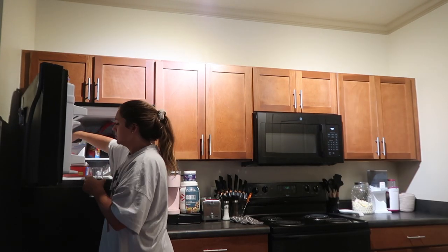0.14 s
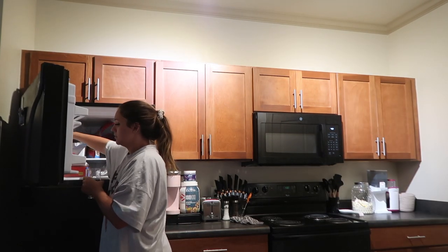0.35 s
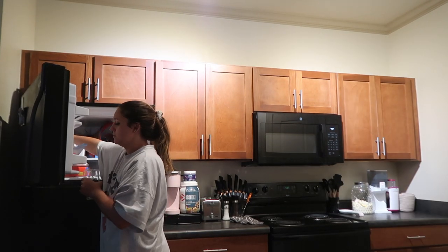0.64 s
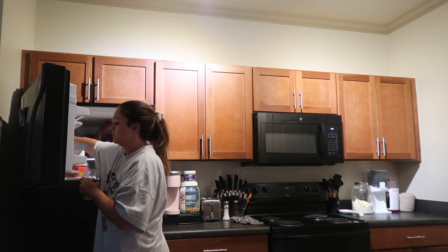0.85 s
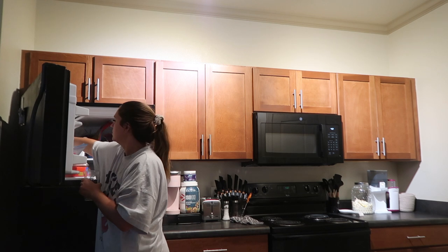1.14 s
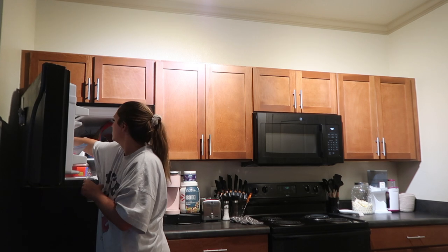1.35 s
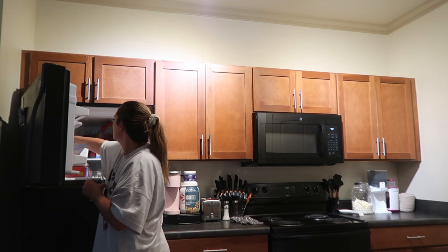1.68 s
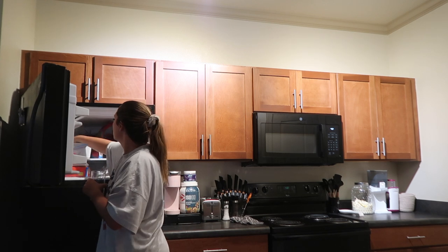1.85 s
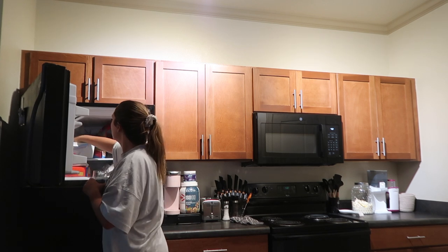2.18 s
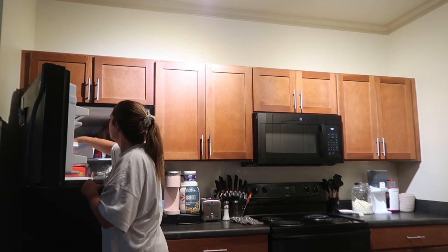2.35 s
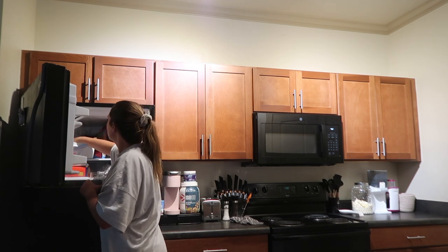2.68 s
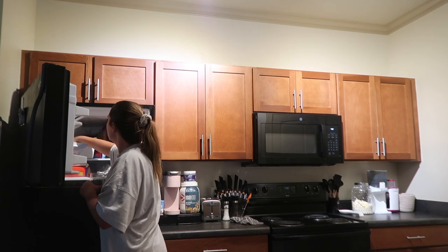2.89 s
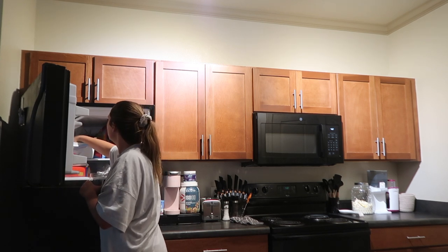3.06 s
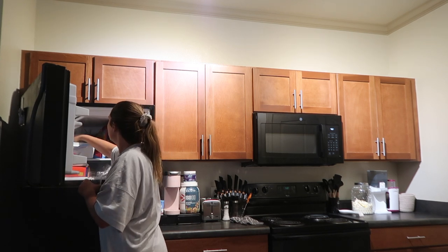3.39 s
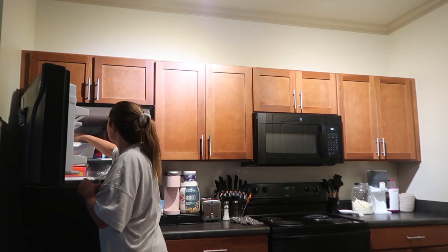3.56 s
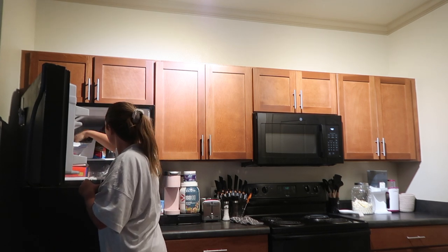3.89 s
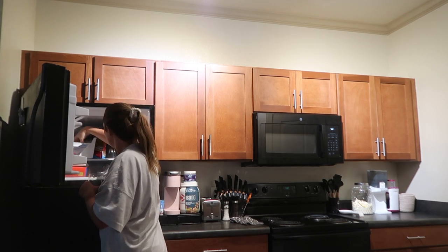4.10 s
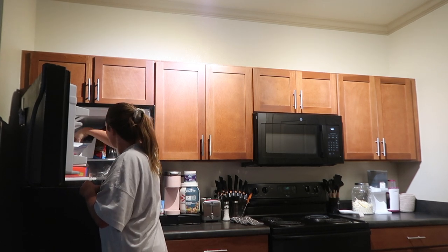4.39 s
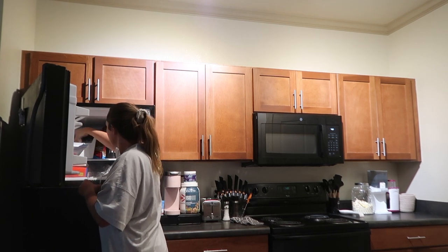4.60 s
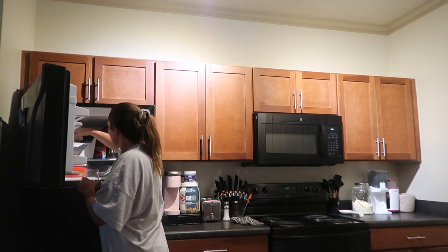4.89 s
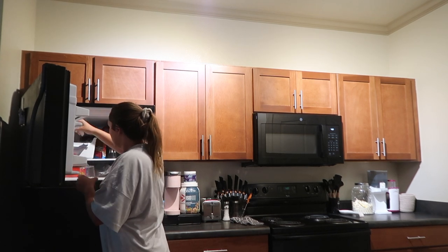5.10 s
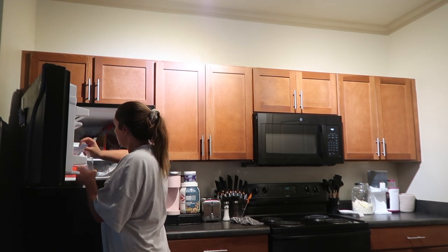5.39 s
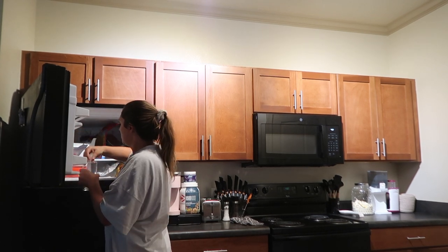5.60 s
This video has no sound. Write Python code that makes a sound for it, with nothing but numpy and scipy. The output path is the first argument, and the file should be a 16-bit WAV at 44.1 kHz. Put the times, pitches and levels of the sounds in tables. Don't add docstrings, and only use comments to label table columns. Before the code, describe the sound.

Rummaging in a freezer: faint taps, then busy clattering of tubs and boxes with hollow thuds, a lull, and one sharp closing knock.

```python
import sys
import numpy as np
from scipy import signal
from scipy.fft import rfft, irfft, next_fast_len
from scipy.io import wavfile

SR = 44100
rng = np.random.default_rng(int(sys.argv[2]) if len(sys.argv) > 2 else 0)


def volts_from_decibels(level):
    exponent = np.asarray(level, float) / 20
    return 10 ** exponent


def pcm_store(signal):
    levels = np.round(np.clip(np.atleast_2d(signal), -1, 1) * 32767)
    wavfile.write(sys.argv[1], SR, levels.astype(np.int16).T)


N = 253134


def rms_one(x):
    return x / np.sqrt(np.mean(x ** 2) + 1e-20)


def in_time(rows):
    s, *columns = np.transpose(rows)
    return [np.interp(np.arange(N) / SR, s, column) for column in columns]


def at_hz(points, hz):
    table_hz, values = np.array(points).T
    return np.interp(np.log(hz + 1), np.log(table_hz), values)


def colour(x, points):
    size = next_fast_len(x.shape[-1])
    gain = volts_from_decibels(at_hz(points, np.fft.rfftfreq(size, 1 / SR)))
    return irfft(rfft(x, size) * gain, size)[..., :x.shape[-1]]


def band_pass(x, low_hz, high_hz, order):
    return signal.sosfilt(signal.butter(order, [low_hz, high_hz], "band", fs=SR, output="sos"), x)


def high_pass(x, hz):
    return signal.sosfilt(signal.butter(2, hz, "high", fs=SR, output="sos"), x)


def drift(rate_hz):
    r = np.exp(-80 * np.pi * rate_hz / SR)
    slow = signal.lfilter([1], [1, -2 * r, r * r], rng.standard_normal(N // 40 + 2002))[2000:]
    return np.interp(np.arange(N) / 40, np.arange(len(slow)), rms_one(slow))


def ring(clicks, hz, t60):
    r = volts_from_decibels(-60 / (t60 * SR))
    w = 2 * np.pi * hz / SR
    return signal.lfilter([0, np.sin(w)], [1, -2 * r * np.cos(w), r * r], clicks + 1e-18)


def add(out, s, sound):
    i = round(s * SR)
    out[i:i + len(sound)] += sound[:N - i]


def contacts(shape, per_s, spread_db):
    size_db = spread_db * np.minimum(rng.exponential(1, shape), 3)
    sizes = volts_from_decibels(size_db) * rng.choice([-1, 1], shape)
    return sizes * (rng.random(shape) < per_s / SR)


def part_db(hz, hollow_db, brittle_db):
    # (frequency [Hz], level per Hz [dB])
    pieces = [(300, -69), (480, -8.5), (700, 1), (1000, -2.5), (1500, -4.5), (2600, -2.5), (3600, -7),
              (5000, -12.5), (6800, -29.5), (9000, -39.5), (13500, -45.5)]
    hollow = np.clip(np.log2(1900 / hz), 0, 1)
    brittle = np.clip(np.log2(hz / 3300), 0, 1.4)
    return at_hz(pieces, hz) + hollow * (hollow_db + 11) + brittle * (brittle_db + 17.0)


def spread(mid, side):
    # (frequency [Hz], side minus mid [dB])
    width = [(60, -62), (110, -32), (200, -20.5), (360, -15.5), (660, -17), (1190, -10.5), (2170, -10),
             (3950, -2.5), (7180, 3), (13000, 5.5)]
    side = colour(side, width)
    return np.array([mid + side, mid - side])


def fridge():
    # (frequency [Hz], level per Hz [dB])
    air_colour = [(15, -45), (25, -45), (70, -12), (125, -5), (234, 0.5), (397, -5), (558, -3), (637, -10),
                  (1110, -19.5), (1260, -13.5), (1780, -16.5), (2030, -20.5), (5810, -35), (10400, -44.5),
                  (13500, -50)]
    # (frequency [Hz], width [Hz], level [dB])
    hum = [(122.3, 7.3, -45), (159.3, 3.2, -44.5), (209.8, 9.6, -44.5), (243.6, 1.7, -46), (286.3, 21, -46),
           (552.3, 8, -54.5)]
    # (time [s], level [dB])
    hum_swell = [
        (0.0, -3),
        (5.74, -4),
    ]
    air_db, waver_db, waver_hz = -37.5, 1.5, 3
    mains_hz, mains_db = 58, -53
    air = volts_from_decibels(air_db) * rms_one(colour(rng.standard_normal((2, N)), air_colour))
    for hz, width_hz, db in hum:
        level = volts_from_decibels(db + waver_db * drift(waver_hz))
        air[0] += level * rms_one(ring(rng.standard_normal(N), hz, 5.6 / width_hz))
    motor = np.sin(2 * np.pi * mains_hz * np.arange(N) / SR)
    air[0] += volts_from_decibels(mains_db + 3 + 2 * drift(4)) * motor
    return spread(*air) * volts_from_decibels(in_time(hum_swell)[0])


def kitchen(x):
    # (frequency [Hz], T60 [s])
    room_t60 = [(100, 0.6), (400, 0.53), (1000, 0.54), (2800, 0.43), (7000, 0.43), (15000, 0.53)]
    gap_s, wall_echo_s, wall_echo_db = 0.0039, 0.03656, -16.5
    t = np.arange(int(.8 * SR)) / SR
    white = rng.standard_normal((2, len(t)))
    edges = 40 * 2 ** np.arange(9.1)
    tail = 0
    for low, high in zip(edges, edges[1:]):
        band = band_pass(white, low, min(high, 19000), 2)
        tail = tail + band * volts_from_decibels(-60 * t / at_hz(room_t60, np.sqrt(low * high)))
    build_up = 1 - np.exp(-t / gap_s)
    wall = 1 + 8 * volts_from_decibels(wall_echo_db) * np.exp(-((t - wall_echo_s) / 0.0033) ** 2)
    tail = tail * build_up * wall
    tail = spread(*tail) / np.sqrt(np.sum(tail[0] ** 2))
    return signal.fftconvolve(x[None], tail)[:, :N]


def close_pair(x):
    treble, top = high_pass(x, 3500), high_pass(x, 7000)
    side = 0.11 * treble + 0.16 * np.roll(treble, 9) + 0.47 * np.roll(top, 2)
    return x + side * np.array([[1], [-1]])


def rustle(cycles, per_s):
    # (time [s], rustle level [dB], relative brittle part [dB])
    rummage = [(0, -59, -6), (.95, -58, -16), (1.18, -36, -6), (1.36, -52, -24), (1.5, -48, -7),
               (1.93, -41, -23), (2.34, -56, -22), (2.45, -30.5, -19), (2.78, -30, -13.5), (3.0, -23, -33),
               (3.45, -34, -26), (3.63, -34.5, -18), (3.82, -24.5, -21), (4.02, -42, -44),
               (4.22, -25.5, -18), (4.57, -51, -25), (4.7, -61, -29), (5.74, -57.5, 1)]
    level_db, brittle_db = in_time(rummage)
    hollow_db = -7 - .15 * (level_db + 40)
    grains = contacts(N, per_s * volts_from_decibels(4.5 * drift(25)), 2.05)
    dealt = rng.integers(0, 20, N)
    out = 0
    for k, hz in enumerate(np.geomspace(420, 13500, 20)):
        gain = volts_from_decibels(part_db(hz, hollow_db, brittle_db)) * np.sqrt(hz / 9000)
        out = out + gain * rms_one(ring(grains * (dealt == k), hz, cycles / hz))
    return volts_from_decibels(level_db - 6.0) * out


def pings():
    # (time [s], peak level [dB], pitch [Hz], T60 [s])
    edge_hits = [
        (1.012, -29.5, 1610, 0.062),
        (1.409, -38, 1604, 0.055),
        (2.606, -30.5, 6000, 0.026),
        (3.011, -12, 3020, 0.017),
        (3.036, -25, 7110, 0.062),
        (3.401, -14, 3050, 0.017),
        (4.169, -31, 9260, .025),
        (5.436, -44, 2095, 0.05),
    ]
    out, t = np.zeros(N), np.arange(5000) / SR
    for s, peak_db, hz, t60 in edge_hits:
        add(out, s, volts_from_decibels(peak_db - 60 * t / t60) * np.sin(2 * np.pi * hz * t))
    return out


def last_knock():
    # (time [s], level [dB])
    blows = [
        (5.7199, -13),
        (5.7243, -14),
        (5.7385, -19),
    ]
    # (frequency [Hz], level [dB], T60 [s])
    hard_tub = [(1630, -10, 0.039), (2540, -35, 0.058), (2930, -4.5, 0.025), (3620, 3, 0.0099),
                (4500, -19, 0.013), (4900, -5, 0.065), (6060, -17, .015), (8700, -18, .015)]
    out, t = np.zeros(N), np.arange(5000) / SR
    for s, db in blows:
        for hz, mode_db, t60 in hard_tub:
            add(out, s, volts_from_decibels(db + mode_db - 60 * t / t60) * np.sin(2 * np.pi * hz * t))
    return out


def thuds():
    # (time of the crest [s], peak level [dB], pitch [Hz], T60 [s])
    landings = [(1.1032, 1, 438, 0.005), (1.1115, -22, 520, 0.051), (1.867, -29, 402, 0.11),
                (2.132, -23, 600, 0.019), (2.465, -21, 622, 0.041), (2.6295, -0.5, 390, 0.0034),
                (2.637, -18, 338, 0.061), (2.826, -10.5, 293, 0.031), (2.87, -2, 330, 0.0068),
                (2.877, -7, 310, 0.038), (2.911, -4, 310, 0.014), (2.979, -15, 313, 0.061),
                (3.033, -10.5, 318, 0.017), (3.046, -9, 284, 0.038), (3.134, -18.5, 320, 0.077),
                (3.295, -16, 870, 0.022), (3.48, -13.5, 400, 0.007), (3.668, -15, 688, 0.048),
                (3.69, -16, 900, .048), (3.784, -13, 715, 0.024), (3.796, -11, 1055, 0.012),
                (3.83, -19, 1260, 0.039), (4.05, -26, 390, 0.024), (4.221, -18, 634, 0.042),
                (4.237, -21, 600, .02), (5.7, -31, 540, 0.017)]
    # (frequency [Hz], level under the thud [dB], T60 [s])
    shelf_modes = [(115.3, -27, 0.51), (219, -42, 0.064), (330, -33.5, 0.1), (520, -19.5, 0.14),
                   (865, -36, 0.031), (1270, -26.5, 0.043), (1756, -23.5, 0.051)]
    swell_ms, softness = 3.4, 0.29
    light_db_per_octave = -12
    out, blows, t = np.zeros(N), np.zeros(N), np.arange(-1000, 5000) / SR
    for s, peak_db, hz, t60 in landings:
        rise_ms = swell_ms * (t60 / 0.063) ** softness
        rise = np.exp(-(t * 1000 / rise_ms) ** 2 / 2)
        swell = np.where(t < 0, rise, volts_from_decibels(-60 * np.abs(t) / t60))
        add(out, s - 1000 / SR, volts_from_decibels(peak_db - 4.5) * swell * np.cos(2 * np.pi * hz * t))
        blow_db = peak_db + light_db_per_octave * max(np.log2(hz / 430), 0)
        add(blows, s - .002, volts_from_decibels(blow_db) * np.hanning(24) / 12)
    return out + sum(volts_from_decibels(db) * ring(blows, hz, t60) for hz, db, t60 in shelf_modes)


def clacks(cycles, per_s):
    # (time [s], peak level [dB], relative hollow part [dB], cluster length [ms])
    frozen = [(.2848, -32, -2, 22), (.712, -28.5, -2, 38), (1.0115, -19.5, -7, 11),
              (1.069, -18.5, -27, 7.9), (1.0844, -15.5, -12, 18), (1.1298, -9.5, -10, 13),
              (1.297, -22, -10, 12.5), (1.514, -21.5, -14.5, 7.9), (1.6613, -19, -13.5, 20),
              (1.709, -15.5, -9, 5.94), (1.95, -27.5, -6, 6.4), (2.4192, -9.5, -31, 53),
              (2.4391, -10, -16, 6.7), (2.762, -23, -23, 8.9), (2.818, -6.5, -10, 16),
              (3.0356, -7.5, -20, 8), (3.223, -21, -20, 6.2), (3.5259, -10, -15.5, 22),
              (3.778, -6, -11, 8.3), (4.119, -24, -12, 5.9), (4.1745, -10.5, -14, 6.5),
              (4.794, -36, -5, 35), (5.708, -23, -10, 6.2), (5.7215, -0.5, -54, 26)]
    # (time [s], peak level [dB], relative hollow part [dB], cluster length [ms])
    plastic = [(.0657, -34, 8, 19), (.5536, -32, -18, 15), (.7765, -30, -3, 31), (1.5787, -29, -3, 20),
               (1.584, -24, 2, 6.5), (2.083, -23.5, -8.5, 16), (2.255, -26.5, -7, 15),
               (2.4638, -8.5, -12.5, 41), (2.53, -13, -30, 25), (2.576, -16, -35, 36),
               (2.6092, -12.5, -20, 11.6), (2.7216, -14, -13.5, 8), (2.814, -23, -13, 6),
               (2.9817, -2.5, -15.5, 17), (3.0103, -3, -12, 55), (3.0951, -10, -10, 23),
               (3.1559, -10.5, -33, 16), (3.294, -9.5, -11, 19), (3.3348, -9.5, -16, 18),
               (3.401, -13.5, -8, 12), (3.4785, -12, -8, 7.47), (3.6773, -9, -13.5, 11.6),
               (4.0976, -19, -23, 19), (4.1482, -11, -14.5, 7), (4.218, -14, -6, 15),
               (4.287, -22, -15, 7.8), (4.37, -20.5, -3, 10.5), (4.4727, -27, -10, 11.7),
               (4.5346, -20, -12, 20), (5.715, -40, 0, 2)]
    # (time [s], peak level [dB], relative hollow part [dB], cluster length [ms])
    cartons = [(.38, -31, 1, 9.1), (.4229, -35, -10, 10), (.5955, -32.5, 3, 11), (.905, -37, 11, 6.9),
               (1.1033, -11, 4, 21), (1.267, -23, -16, 9.2), (1.4091, -32.5, -26, 14),
               (1.8826, -23.5, -5, 37), (2.0275, -21, -10, 27), (2.1256, -23.5, 2.5, 27),
               (2.395, -31, -9, 5.9), (2.4022, -15, -12, 33), (2.6653, -28, 10, 5), (2.691, -12.5, -49, 25),
               (2.9163, -10, 2, 19), (2.9386, -8, -10, 18), (3.0698, -6, -23, 32), (3.3618, -15, -11, 54),
               (3.6645, -7, -19, 27), (3.7827, -1.5, -20.5, 15.6), (3.825, -38, -5, 14),
               (3.9687, -22, -8, 18), (4.0423, -19.5, -15, 13), (4.2038, -16, -3, 9.7),
               (4.2378, -15, -17, 14), (4.2589, -14, -9, 12.4), (4.4992, -24, -9, 24),
               (5.1624, -31.5, 4, 25), (5.3872, -43, 10, 8.3), (5.4355, -34, 7, 22)]
    # (time [s], peak level [dB], relative hollow part [dB], cluster length [ms])
    flakes = [
        (1.062, -21.5, -20, 7.1),
        (1.4755, -32, -16, 6.6),
        (4.327, -21.5, -17, 10),
        (5.557, -37.5, -14, 8.9),
        (5.578, -42, -12, 9),
        (5.5955, -41, -16, 1.5),
        (5.6215, -46, -14, 1.4),
    ]
    # (time [s], peak level [dB])
    brushes = [(.1665, -44), (.2094, -48), (.2645, -51), (.5183, -56), (.6794, -48), (1.004, -26),
               (1.034, -32), (1.096, -16), (1.44, -45), (2.3615, -46), (3.6346, -37), (2.688, -20),
               (3.29, -19.5), (4.0183, -48), (4.142, -22), (4.7311, -48), (4.9422, -55), (5.0125, -60),
               (5.1218, -52), (5.5049, -42)]
    build_up_ms, build_up_share = 5.0, .42
    snaps_per_s, snap_share = 500, 0.68

    materials = ((frozen, -5), (plastic, -15), (cartons, -26), (flakes, 2))
    rows = [(*row, brittle_db) for table, brittle_db in materials for row in table]
    rows += [(s, db, -13, 6.5, -11) for s, db in brushes]

    out, t = np.zeros(N), np.arange(3000) / SR
    centres = np.geomspace(450, 13500, 26)
    chance = rng.standard_normal((len(rows), 2, 26))
    touches = contacts((len(rows), 26, 3000), per_s, 3.6)
    touches = touches + snap_share * contacts((len(rows), 1, 3000), snaps_per_s, 4.52)
    for (s, peak_db, hollow_db, ms, brittle_db), (detune, uneven), touch in zip(rows, chance, touches):
        rise = min(build_up_ms, build_up_share * ms) / 1000
        decay = np.exp(-np.maximum(t - rise, 0) * 1000 / max(ms, 1.5))
        force = np.minimum(t / rise, 1) ** 1.26 * decay
        sound = np.zeros(3000)
        for centre, d, u, clicks in zip(centres, detune, uneven, touch):
            hz = centre * (1 + 0.021 * d)
            gain = volts_from_decibels(part_db(centre, hollow_db, brittle_db) + 2.03 * u) * np.sqrt(hz)
            sound += gain * rms_one(ring(clicks * force, hz, cycles / hz ** 0.71))
        add(out, s - .45 * rise, volts_from_decibels(peak_db - 4.5) * sound / np.abs(sound).max())
    return out


def scene():
    shelf = rustle(cycles=26.4, per_s=5000) + pings() + last_knock() + thuds()
    shelf = shelf + clacks(cycles=3.06, per_s=1500)
    shelf = band_pass(shelf, 128, 8780, 3)
    return volts_from_decibels(4.0) * close_pair(shelf) + volts_from_decibels(-1) * kitchen(shelf) + fridge()


def low_pass(x):
    return signal.sosfilt(signal.butter(12, 15200, fs=SR, output="sos"), x)


def record(dry):
    mix = 0.92 * np.tanh(dry / 0.93)
    return low_pass(mix)


dry = scene()
out = record(dry)
pcm_store(out)
```